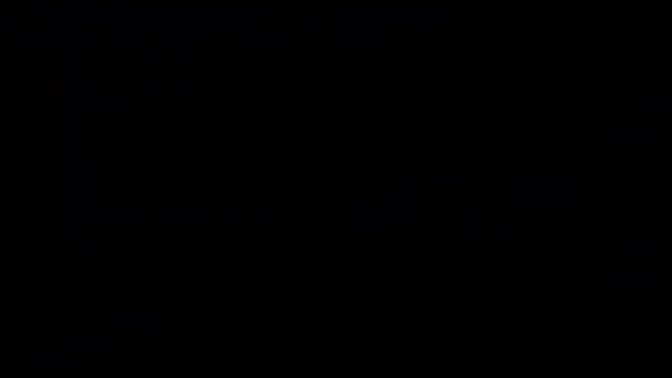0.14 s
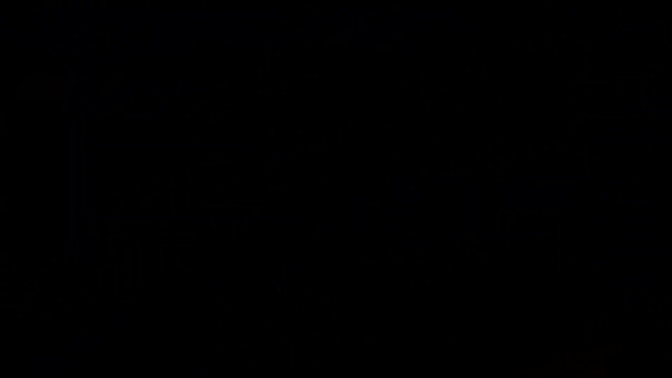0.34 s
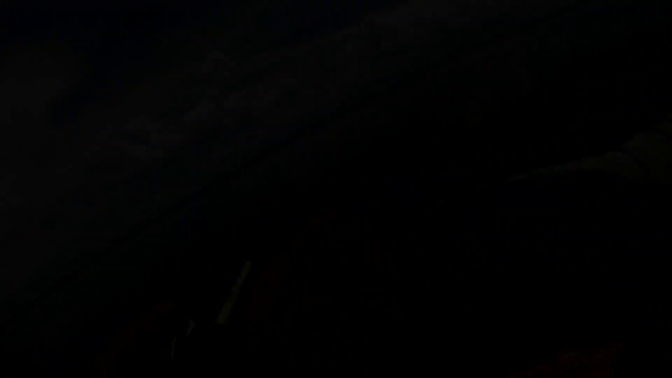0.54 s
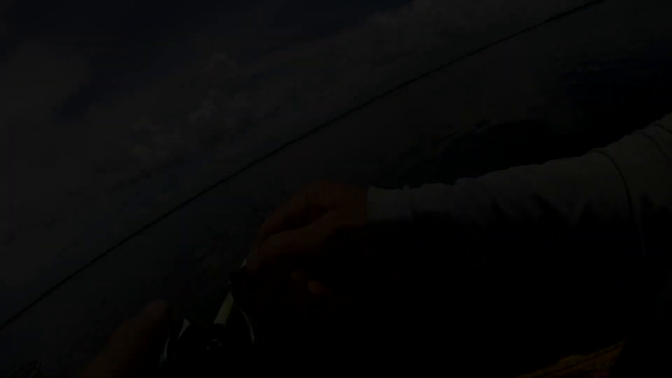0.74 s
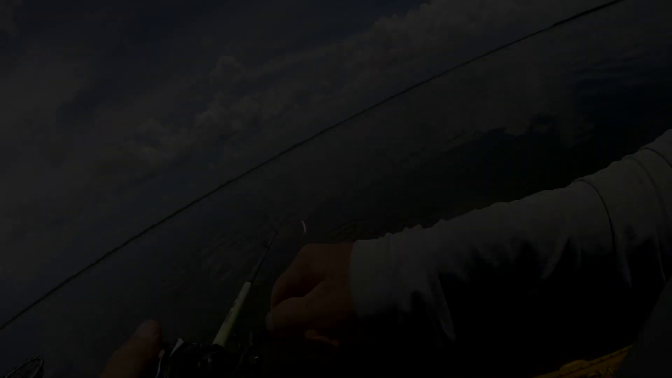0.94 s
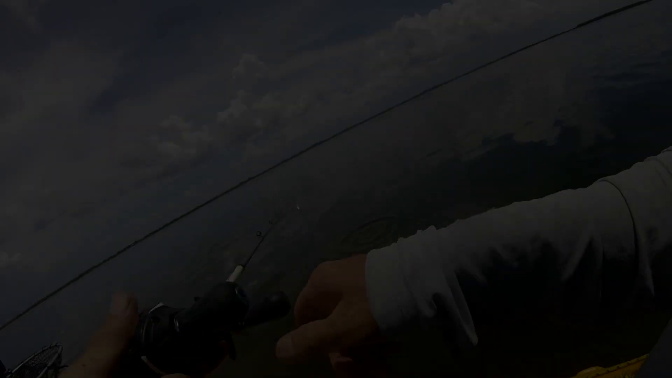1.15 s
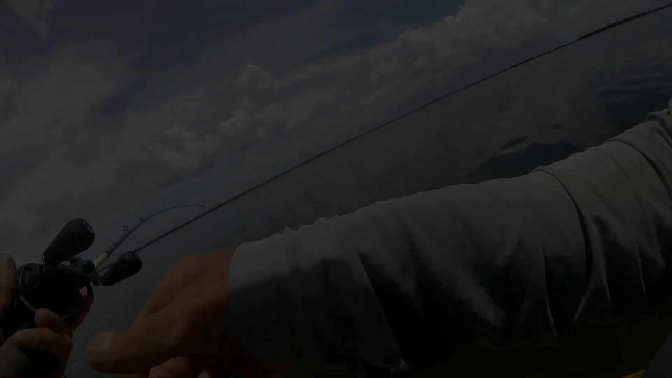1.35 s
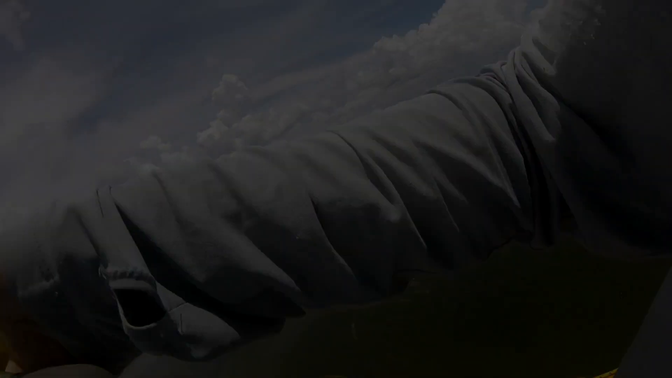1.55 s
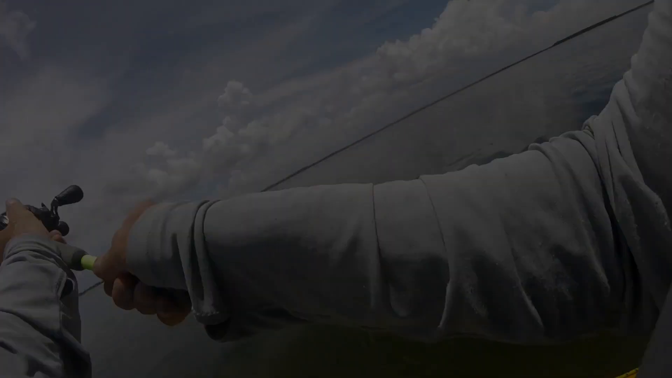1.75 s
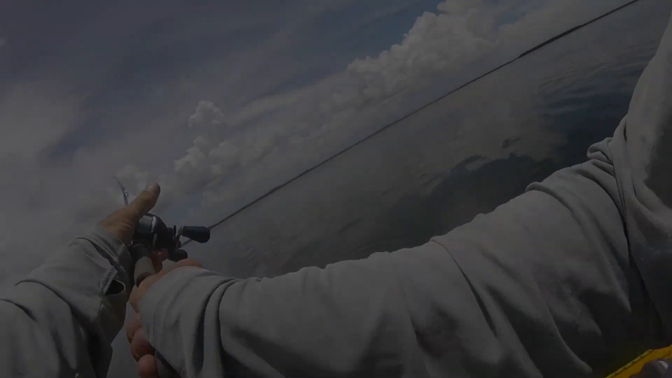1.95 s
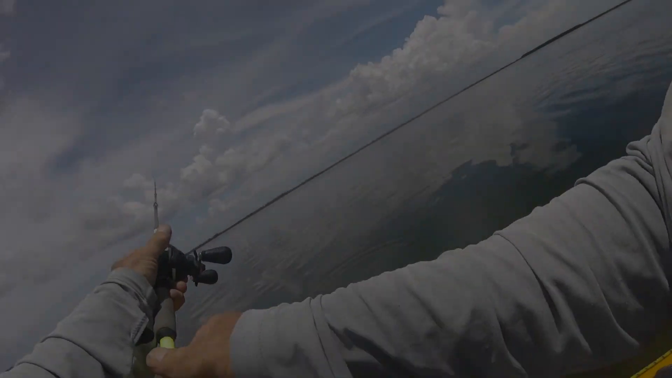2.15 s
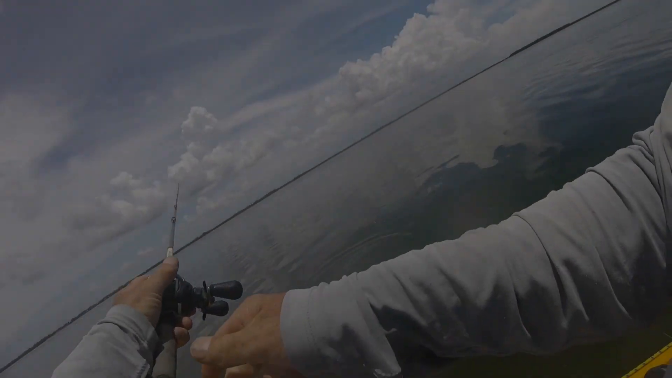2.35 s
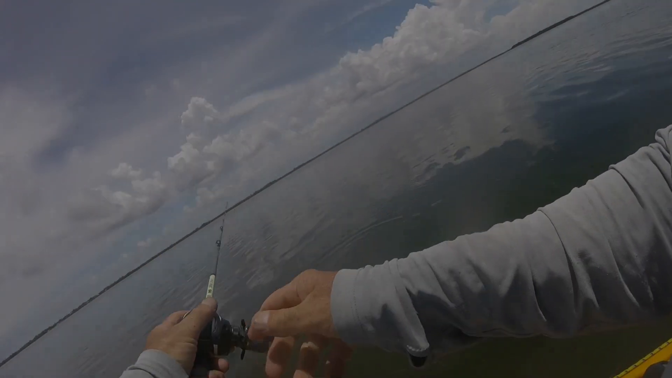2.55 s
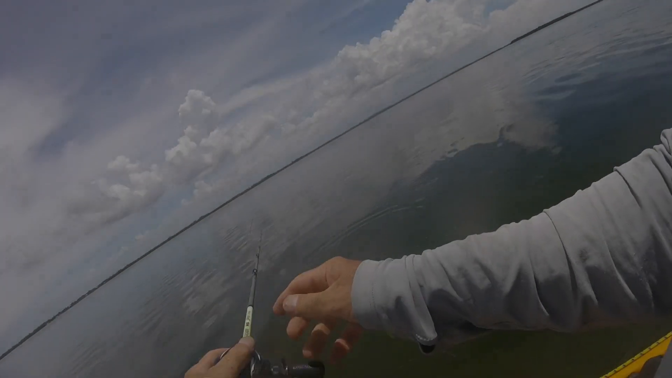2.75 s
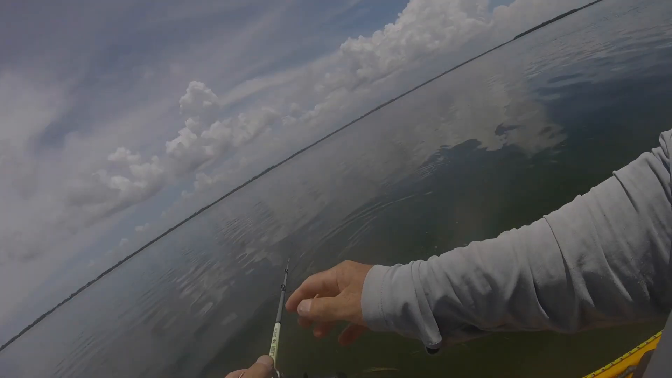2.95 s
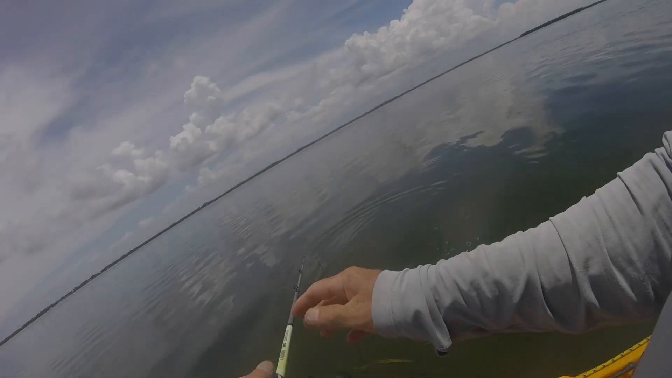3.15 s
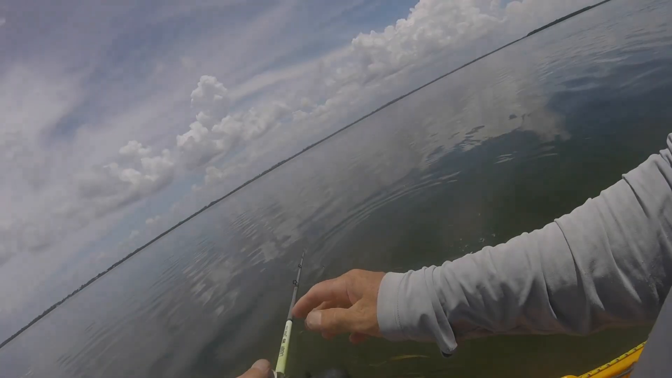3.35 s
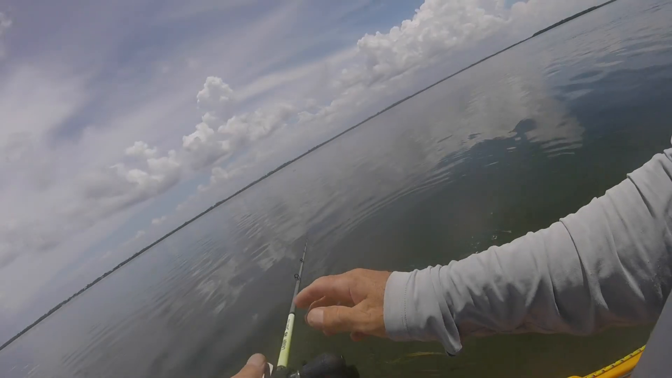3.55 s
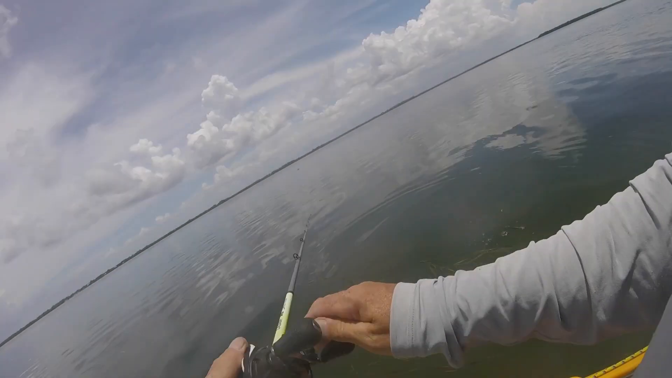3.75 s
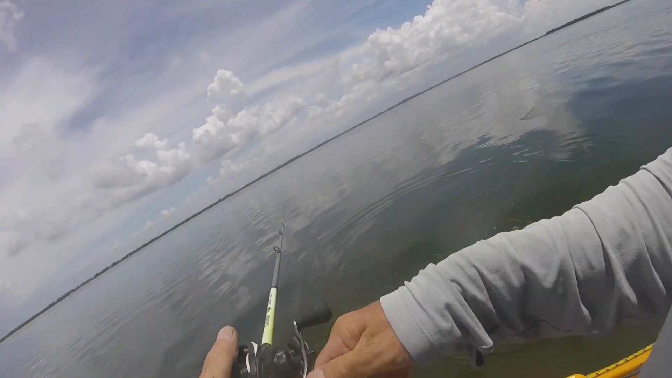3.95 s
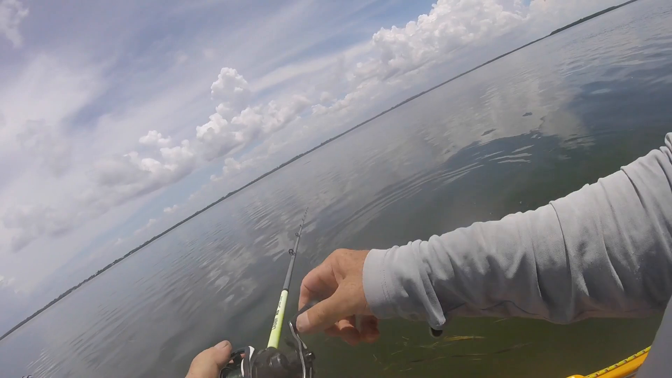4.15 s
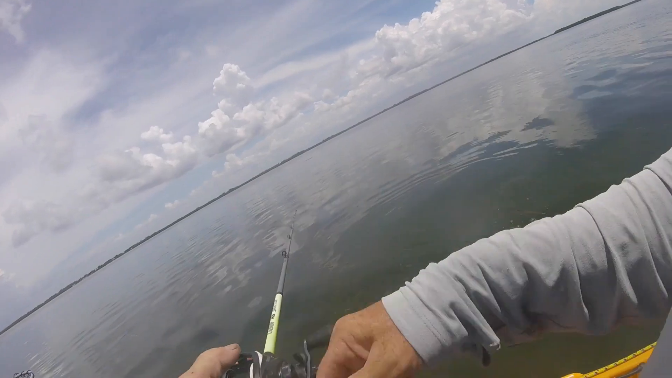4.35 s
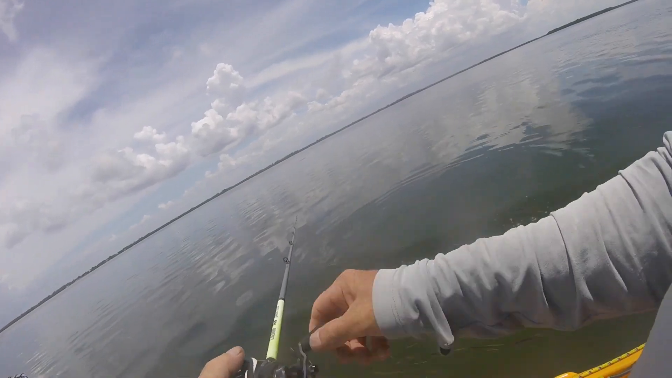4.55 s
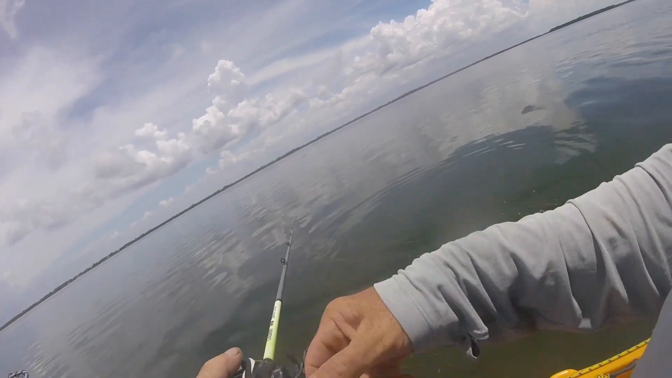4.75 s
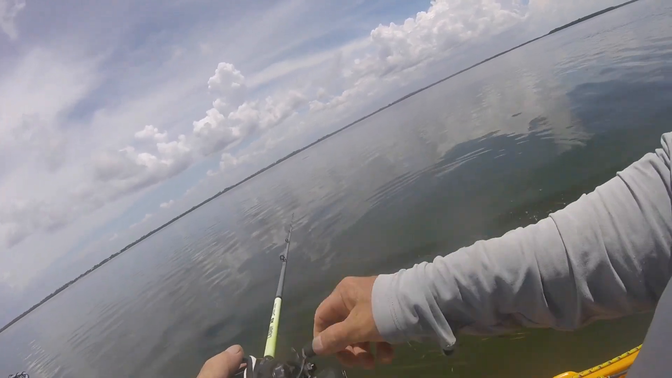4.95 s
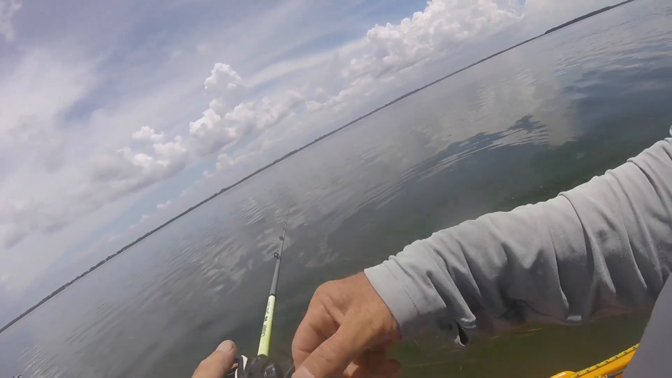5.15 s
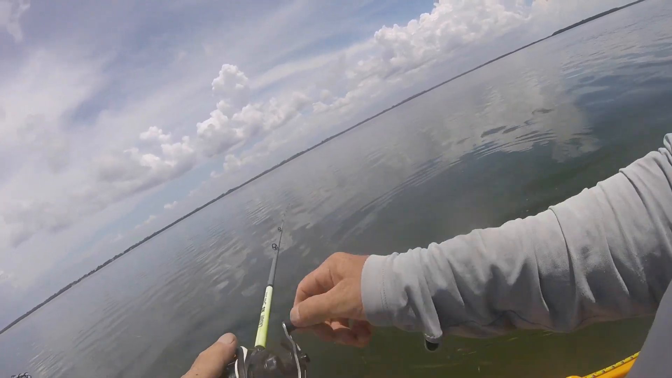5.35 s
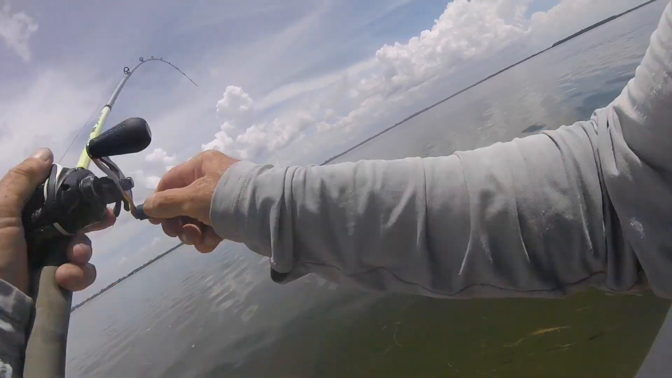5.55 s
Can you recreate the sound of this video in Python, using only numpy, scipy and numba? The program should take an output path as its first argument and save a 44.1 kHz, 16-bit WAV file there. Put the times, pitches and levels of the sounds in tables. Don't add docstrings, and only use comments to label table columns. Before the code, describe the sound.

Small ticks of fingers on a fishing reel, a sharp click, a whirring spool that slows, a hard snap, then soft grinding winding outdoors.

```python
import sys
import numpy as np
from scipy import signal
from scipy.fft import rfft, irfft, next_fast_len
from scipy.io import wavfile
from scipy.ndimage import uniform_filter1d
from numba import njit

SR = 44100
rng = np.random.default_rng(int(sys.argv[2]) if len(sys.argv) > 2 else 0)


def gain_from_decibels(decibels):
    exponent = np.asarray(decibels, float) / 20
    return 10 ** exponent


def generate_wav(sig):
    pcm = np.round(np.clip(np.atleast_2d(sig).T, -1, 1) * 32767).astype(np.int16)
    wavfile.write(sys.argv[1], SR, pcm)


N = 250791
TIME = np.arange(N) / SR

# (time [s], turns per second [Hz])
SPOOL_SPEED = [
    (1.879, 299.8),
    (2.05, 275),
    (2.431, 197.5),
    (2.629, 165),
    (2.858, 131.1),
    (3.28, 99.9),
    (3.701, 85.7),
]
# (let go [s], time to reach speed [s], thumb lands [s], time to stop [s])
SPOOL_RUN = (1.882, .045, 3.615, .095)
# (frequency [Hz], level [dB per Hz])
WHIRR_RELEASE = [(1060, -42), (1800, -3.5), (2130, 2), (2660, 0), (2830, -3), (3200, -6), (3560, 9),
                 (4210, 1.5), (5480, 3), (6230, 2.5), (6540, -4), (6920, -3), (7920, -9), (9800, -6.5),
                 (12700, -44), (21600, -120)]
# (frequency [Hz], level [dB per Hz])
WHIRR_STRETCHED = [(1060, -48), (1800, -20), (2360, -2.5), (2790, -13.5), (3020, -6), (3360, -6.5),
                   (4190, -6), (5600, -6), (6270, -3), (6590, -8), (6870, -16), (7490, -2), (8560, -7.5),
                   (9800, -18), (12700, -47), (21600, -120)]
# (frequency [Hz], level [dB per Hz])
WHIRR_CHEST = [(1060, -52), (1800, -10), (2050, -10), (2440, -1.5), (2700, -8), (3340, -3.5), (3820, -13),
               (4460, -1.5), (5330, -9.5), (5720, -5), (6400, -2.5), (7540, -3), (9130, -2.5), (9800, -10),
               (12700, -33), (21600, -120)]
# (leave first pose [s], second pose [s], leave it [s], last pose [s])
LOWERING = (2.12, 2.22, 2.58, 2.74)
# (time [s], length [s], frequency [Hz], width [Hz], level [dB])
LINE_WHINE = (4, -0.8, 3600, 500, -18.5)
# (time [s], frequency [Hz])
FRAME_PITCH = [(1.91, 1180), (1.97, 1480), (2.2, 1350), (2.43, 1230), (2.95, 1270), (3.5, 1200),
               (3.6, 1300), (3.63, 1130)]

# (frequency [Hz], width [Hz], level [dB])
SIDE_PLATE = [(716, 430, -2.5), (832, 120, -3), (1111, 290, 6), (1380, 440, -17.5)]
# (frequency [Hz], level [dB per Hz])
LINE_RUB = [(880, -29), (1500, -8), (1870, 0.5), (2010, -11.5), (2150, -1.5), (2780, -9.5), (3240, -4),
            (3820, -14.5), (4200, -9), (5460, -56), (9240, -120)]
# (start [s], time to get going [s], end [s], time to stop [s])
WINDING = (3.97, 0.26, 5.59, 0.015)
# (time [s], change of effort [dB], length [s])
HAND_PUSHES = [(4.08, 6, 0.043), (4.155, 4, 0.01), (4.252, 0.5, .05), (4.43, 3.5, 0.098), (4.48, -4, 0.039),
               (4.646, 3.5, 0.023), (4.82, 1.5, 0.065), (5.08, 2.5, 0.027), (5.17, 2, 0.043),
               (5.356, -3, .05), (5.407, 3.5, 0.021), (5.54, 3, 0.036), (4.134, -14, 0.0094),
               (4.18, -1.5, .012)]
# (end [s], time to stop [s], gears above steady level [dB])
LAST_TURN = (0.107, .015, 3.1)

# (time [s], peak [dB], share of low ring [dB], ring [Hz], contact [ms])
TICKS = [(0.1189, -44, -25, 5400, 1.2), (0.1474, -38, -20, 5700, 1), (0.2166, -34, -14, 4730, 1.2),
         (0.2608, -46, -8, 5710, 1.5), (0.3086, -30.5, -23, 2300, 1.5), (0.3845, -49, -12, 2390, 1.6),
         (0.4214, -36, -18, 5400, 3), (0.4753, -33, -8.5, 3520, 2), (0.616, -47, -4, 2550, 1.6),
         (0.6664, -45, -23, 2310, 2.5), (0.7794, -53, -7, 2330, 1.5), (1.2446, -40, -19, 5000, 1),
         (1.3463, -47, -26, 4880, 1.3), (1.729, -52, -21, 6100, 1.5), (1.741, -44, -18, 5440, 1.5),
         (1.8604, -42, -5, 2060, 1.3), (1.9674, -30.5, -14, 4580, 1.3), (3.878, -32, -16, 5760, 2.3),
         (4.116, -41, -3, 2550, 1.5), (4.1445, -39.5, -9, 6300, 0.62), (4.442, -45, 7, 2000, 1.2),
         (4.4504, -37, 13, 2170, 1.4), (4.8074, -43, 0, 2210, 1.3), (5.597, -53, -17, 2880, 1.5)]
# (time [s], peak [dB], share of low ring [dB], ring [Hz], contact [ms])
SPRING_CREEP = [
    (0.134, -46, -20, 3600, 2),
    (1.2865, -43, -14, 3000, 3),
    (1.3215, -43, -14, 5200, 4),
    (3.895, -41, -7, 5500, 4),
    (3.914, -45, -6, 5600, 5),
]
# (time [s], peak [dB], hardness [dB per octave])
THUMB_BAR = [
    (1.3059, -24, 1),
    (1.3072, -16, 0),
    (1.3079, -16, 0),
    (1.3091, -23, -1),
    (1.3115, -33, -1.5),
]
# (time [s], peak [dB], hardness [dB per octave])
CLUTCH = [
    (3.9325, -17.5, 1.5),
    (3.9344, -16, -1.3),
    (3.9360, -10, 1.5),
    (3.9405, -26, .5),
    (3.944, -24.5, 1.5),
    (3.9475, -28, 1.5),
    (3.951, -38, -1),
]
# (frequency [Hz], level [dB], time to fade by 60 dB [s])
THUMB_MODES = [(545, -16, 0.012), (1330, -8, .02), (1730, -12.5, 0.0091), (2440, -1, 0.0091),
               (3220, -4.5, 0.0056), (4120, -0.5, 0.0063), (4570, 3, 0.0082), (5500, 0.5, 0.0049),
               (6370, -1, 0.0054), (7940, -7, 0.0047), (9100, -17, 0.0041), (11200, -25, 0.0043)]
# (frequency [Hz], level [dB], time to fade by 60 dB [s])
CLUTCH_MODES = [(520, -24, .02), (720, -16, 0.014), (1148, -8, 0.035), (1370, -15, 0.026),
                (1850, -16, 0.0061), (2180, -6.5, 0.0088), (2680, -8.5, 0.0083), (3460, -10, 0.0086),
                (3950, -9, 0.0047), (4530, -6.5, 0.0059), (5440, -4.5, 0.006), (6530, -1, 0.0057),
                (7450, -6, 0.0046), (8730, -10, 0.0048), (10820, -9, 0.004), (12300, -24, 0.0046)]

# (time [s], swing [Hz], length [s], peak [dB])
PUFF = (1.79, 33, 0.017, -29.5)
# (time [s], peak [dB], high whoosh above low [dB])
STROKES = [
    (1.685, -65, 4),
    (1.773, -46.5, -1.5),
    (1.795, -52, 6),
    (1.855, -48, -9),
    (1.91, -49, -1),
    (2.02, -56.5, -3),
    (2.08, -61.5, 6.5),
]
# (time [s], peak [dB], length [s], brightness [dB per band])
RUBS = [(0.06, -60, 0.075, -4), (0.148, -57, .04, -3), (0.194, -59, 0.054, -2), (0.344, -57, 0.12, -4),
        (0.385, -59, .02, -3), (0.484, -64, 0.071, -2), (0.612, -63, 0.11, -9), (0.82, -61.5, 0.066, -8),
        (1.043, -63.5, 0.031, -8), (1.252, -66, 0.03, 3), (1.34, -81.5, 0.067, 8), (1.51, -72, 0.071, -4),
        (1.674, -67, 0.082, -3.5), (1.735, -72, 0.0099, 4), (1.79, -67.5, 0.033, 1),
        (1.893, -55, 0.025, -4)]

# (frequency [Hz], level [dB per Hz])
AIR_COLOUR = [(24, -38), (40, -10.5), (70, 1), (99, -14.5), (201, -16), (604, -24), (699, -24.5),
              (960, -27.5), (1530, -32.5), (1690, -31), (2890, -35), (5450, -45), (6630, -31), (13800, -46)]
# (time [s], peak [dB], length [s])
GUSTS = [(0.1, -66, .05), (0.46, -47.5, .03), (0.57, -56, 0.025), (0.94, -70, 0.045), (1.67, -54, 0.051),
         (1.86, -46, 0.06), (2.0, -48.5, .08), (2.2, -57, 0.06), (2.56, -54, .04), (2.95, -54, 0.036),
         (4.34, -56.5, .05), (4.62, -57, 0.078), (5.1, -65, 0.036), (5.5, -54, 0.096), (5.63, -50, 0.045)]
# (time [s], peak [dB], length [s])
HULL_LAPS = [(0.02, -60, 0.039), (0.3, -55, 0.095), (0.44, -55.5, 0.019), (0.92, -57.5, 0.027),
             (1.785, -55, 0.024), (1.91, -52.5, 0.084), (2.03, -49.5, 0.079), (2.21, -54.5, .05),
             (2.6, -55.5, 0.026), (2.96, -59, 0.03), (4.12, -51, 0.035), (4.33, -63, 0.035),
             (5.16, -71, 0.031), (5.5, -58.5, 0.063), (5.66, -61, 0.021)]
# (frequency [Hz], width [Hz], lift [dB])
HOUSING = (6430, 600, 6.66)


def spool():
    s, speed = np.transpose(SPOOL_SPEED)
    speed = np.interp(TIME, s, speed)
    octaves = np.log2(speed / 300)
    hz = speed * (1 + 0.0042 * walk(14))
    turn = np.cumsum(hz) / SR
    throb = 1 + 0.38 * np.cos(2 * np.pi * turn)
    pose = np.interp(TIME, LOWERING, (0.33, 0.77, 1.4, 2))

    hiss = throb * grit(scatter_db=1.0, per_s=500)
    whirr = 0
    for k, shape in enumerate((WHIRR_RELEASE, WHIRR_STRETCHED, WHIRR_CHEST)):
        nearness = np.clip(1 - np.abs(pose - k), 0, 1)
        whirr = whirr + nearness * colour(hiss, shape)
    whirr = signal.sosfilt(signal.ellip(6, 1, 40, 9850, fs=SR, output="sos"), whirr)
    s, length, whine_hz, width, db = LINE_WHINE
    whirr = whirr + gain_from_decibels(db) * hump_at(s, length) * steep(hiss, whine_hz, width)
    whirr = whirr + gain_from_decibels(-32) * steep(hiss, 11800, 3000)
    whirr = whirr * gain_from_decibels(2.7 * hump_at(1.945, 0.025))
    whirr_gain = span(*SPOOL_RUN) * gain_from_decibels(-44 + 5.5 * octaves)

    flaws = turn_echo(rng.standard_normal(N), SR / hz, 0.5)
    frame_hz = np.interp(TIME, *np.transpose(FRAME_PITCH))
    hum = level(band(band(flaws, frame_hz, 300.0), frame_hz, 320.0), 0)
    orders = gain_from_decibels(-4.0 - 6.3 * pose) * steep(flaws, 717, 480)
    wobble = gain_from_decibels(-7) * np.sin(2 * np.pi * turn) * gain_from_decibels(2.7 * walk(12))

    let_go, rise, lands, stop = SPOOL_RUN
    thumb = span(lands - .035, .025, lands + .052, .015)
    pressed = span(lands, .035, lands + .052, .015)
    brake = pressed * gain_from_decibels(-56.5) * steep(rng.standard_normal(N), 660, 290)
    hum_gain = span(let_go - .012, rise, lands - .04, stop) * gain_from_decibels(-52 + 3 * octaves)
    hum_gain = hum_gain + thumb * gain_from_decibels(-53)
    return brake + whirr_gain * whirr + hum_gain * (hum + orders + wobble)


def handle():
    gear_db, rub_db, fizz_db = -59, -69, -73
    effort_db = sum(db * hump_at(s, length) for s, db, length in HAND_PUSHES)
    teeth = np.cumsum(71 * (1 + 0.0398 * walk(5))) / SR
    chatter = (1 + 0.31 * np.cos(2 * np.pi * teeth)) * grit(scatter_db=1.0, per_s=60)
    gears = sum(gain_from_decibels(db) * bell(bell(chatter, hz, width), hz, 1.01 * width) for hz, width, db in SIDE_PLATE)
    gears = level(gears, 0)

    line = grit(scatter_db=1.5, per_s=90)
    rub = gain_from_decibels(rub_db) * colour(line, LINE_RUB)
    rub = rub + gain_from_decibels(fizz_db - .4 * effort_db) * steep(line, 5550, 2700)

    turning = gain_from_decibels(-8) * span(3.94, 0.016, 5.69, .1) + span(*WINDING)
    end, stop, db = LAST_TURN
    before = span(-1, 1, end, stop) * gain_from_decibels(gear_db + db) * gears
    return before + turning * (gain_from_decibels(gear_db + effort_db) * gears + gain_from_decibels(1.87 * effort_db) * rub)


def clicks():
    out = np.zeros(N)
    for s, db, low_db, hz, contact_ms in list(TICKS) + list(SPRING_CREEP):
        modes = [(1180, low_db + 6.5, .012), (hz, -2.5, .005), (1700, low_db - 2, .006)]
        modes += [(f, -3, .004) for f in (2370, 3300, 4650, 5800, 6140)]
        modes += [(8200, -6.0, .003)]
        add_blow(out, s, db, modes, contact_s=contact_ms / 1000, scatter_db=2.5)
    for s, db, tilt_db in THUMB_BAR:
        add_blow(out, s, db, tilted(THUMB_MODES, tilt_db), contact_s=.00002, scatter_db=1.5)
    for s, db, tilt_db in CLUTCH:
        add_blow(out, s, db, tilted(CLUTCH_MODES, tilt_db), contact_s=.000015, scatter_db=2)
    return signal.sosfilt(signal.butter(3, 12000, fs=SR, output="sos"), out)


def swing():
    rise_s, fall_s = 0.011, 0.039
    s, hz, length, db = PUFF
    out = -gain_from_decibels(db) * np.sin(2 * np.pi * hz * (TIME - s)) * hump_at(s, length)
    eddies = grit(scatter_db=2.5, per_s=45)
    low, high = steep(eddies, 404, 160), steep(eddies, 1000, 520)
    for s, db, high_db in STROKES:
        stroke = np.exp(-np.maximum((s - TIME) / rise_s, (TIME - s) / fall_s))
        out = out + gain_from_decibels(db) * stroke * (low + gain_from_decibels(high_db) * high)
    return out


def rustle():
    gains = []
    for k in range(3):
        rows = [(s, db + k * tilt_db, length) for s, db, length, tilt_db in RUBS]
        gains.append(swells(rows, calm_db=-76))
    dull, mid, bright = gains
    cloth = grit(scatter_db=3.5, per_s=90)
    out = dull * steep(cloth, 980, 1550)
    out = out + gain_from_decibels(-5.5) * mid * steep(cloth, 2500, 2900)
    return out + gain_from_decibels(1.8) * bright * steep(cloth, 4800, 1940)


def air():
    bed = level(colour(rng.standard_normal(N), AIR_COLOUR), -54.5)
    hump = gain_from_decibels(-64.5) * steep(rng.standard_normal(N), 68.6, 42)
    buffet = steep(rng.standard_normal(N), 29.0, 40)
    lapping = grit(scatter_db=3.5, per_s=16)
    boom = level(steep(lapping, 152, 77) + gain_from_decibels(-4.5) * steep(lapping, 208.4, 79), 0.054)
    return bed + hump + swells(GUSTS, calm_db=-64) * buffet + swells(HULL_LAPS, calm_db=-67.5) * boom


def add_blow(out, s, db, modes, contact_s, scatter_db):
    t = np.arange(2600) / SR
    chance = rng.standard_normal((30, 2))
    ring = np.zeros(len(t))
    for (hz, mode_db, t60), (strength, shift) in zip(modes, chance):
        phase = 2 * shift * min(hz / 3000, 1)
        fade = np.exp(-np.log(1000) * t / t60)
        ring += gain_from_decibels(mode_db + scatter_db * strength) * np.sin(2 * np.pi * hz * t + phase) * fade
    ring = ring * (1 - np.exp(-t / .00025))
    contact = rng.standard_normal(300) * np.exp(-t[:300] / contact_s)
    blow = np.convolve(ring, contact)
    start = int(s * SR)
    blow = blow[:N - start]
    out[start:start + len(blow)] += gain_from_decibels(db) * blow / np.abs(blow).max()


def tilted(modes, db_per_octave):
    return [(hz, db + db_per_octave * np.log2(hz / 3000), t60) for hz, db, t60 in modes]


@njit
def turn_echo(x, lag, share):
    y = x.copy()
    for i in range(2000, len(x)):
        k = int(lag[i])
        part = lag[i] - k
        y[i] += share * ((1 - part) * y[i - k] + part * y[i - k - 1])
    return y


@njit
def band(x, hz, width):
    y, b, l = np.empty(len(x)), 0., 0.
    for i in range(len(x)):
        g, k = np.tan(np.pi * hz[i] / SR), width / hz[i]
        v = (b + g * (x[i] - l)) / (1 + g * (g + k))
        b, l, y[i] = 2 * v - b, l + 2 * g * v, k * v
    return y


def bell(x, hz, width):
    return signal.lfilter(*signal.iirpeak(hz, hz / width, fs=SR), x)


def steep(x, hz, width):
    return level(bell(bell(x, hz, width), hz, width), 0)


def colour(x, points):
    hz, db = np.transpose(points)
    size = next_fast_len(N)
    axis = np.log(np.arange(size // 2 + 1) * SR / size + 1)
    gain = gain_from_decibels(np.interp(axis, np.log(hz), db))
    return level(irfft(rfft(x, size) * gain, size)[:N], 0)


def level(x, db):
    return x * gain_from_decibels(db) / np.sqrt(np.mean(x ** 2))


def grit(scatter_db, per_s):
    return rng.standard_normal(N) * gain_from_decibels(scatter_db * walk(per_s))


def walk(rate):
    k = int(SR / rate)
    steps = np.repeat(rng.standard_normal(N // k + 1), k)
    return 1.3 * uniform_filter1d(uniform_filter1d(steps, k), k)[:N]


def hump_at(s, length):
    return np.exp(-((TIME - s) / length) ** 2 / 2)


def swells(rows, calm_db):
    return np.sqrt(gain_from_decibels(calm_db) ** 2 + sum((gain_from_decibels(db) * hump_at(s, length)) ** 2 for s, db, length in rows))


def span(start, rise, end, fall):
    return (np.clip((TIME - start) / rise, 0, 1) * np.clip(1 - (TIME - end) / fall, 0, 1)) ** 2


def scene():
    return (spool() + handle() + rustle() + swing() + clicks() + air())[None]


def starved_top(x, step_db, follow):
    sparse_hz, top_hz = 9600, 13000
    hz, _, z = signal.stft(x, SR, nperseg=1024)
    size = np.abs(z)
    patch = uniform_filter1d(uniform_filter1d(size, size=5, axis=0), size=2, axis=1)
    loud = size[(hz > 2000) & (hz < sparse_hz)].mean(axis=0)
    step = np.median(patch[(hz > 10500) & (hz < top_hz)]) * (loud / np.median(loud)) ** follow
    rough_db = np.interp(hz, (sparse_hz, sparse_hz + 300, 11000, top_hz, 14300), (-30, 0, -1.5, -1, 14))
    keep = patch > step * gain_from_decibels(step_db + rough_db)[:, None]
    return signal.istft(z * keep * (hz < 14400)[:, None], SR, nperseg=1024)[1][:N]


def roll_off(x):
    return signal.sosfilt(signal.butter(12, 14530, fs=SR, output="sos"), x)


def record(dry):
    hz, width, lift_db = HOUSING
    ring = bell(bell(dry[0], hz, 1.56 * width), hz, 1.56 * width)
    heard = dry[0] + (gain_from_decibels(lift_db) - 1) * ring
    mix = starved_top(heard, step_db=-1.5, follow=.1)[None]
    return roll_off(mix)


dry = scene()
out = record(dry)
generate_wav(out)
```